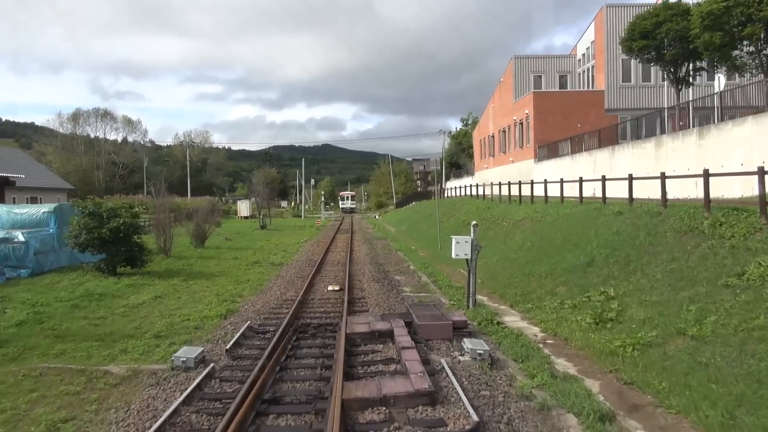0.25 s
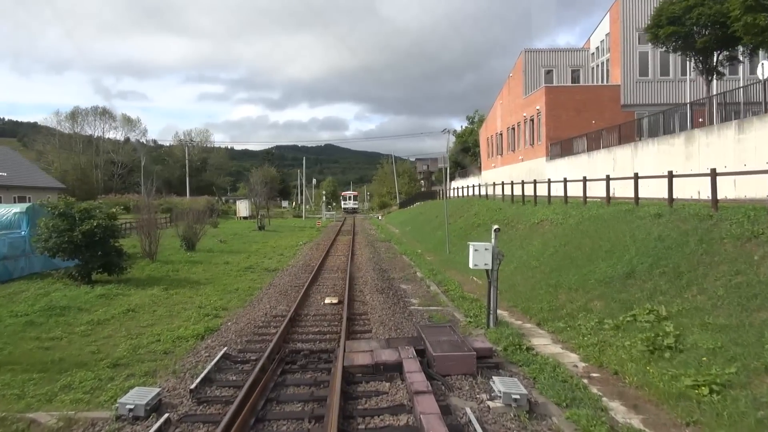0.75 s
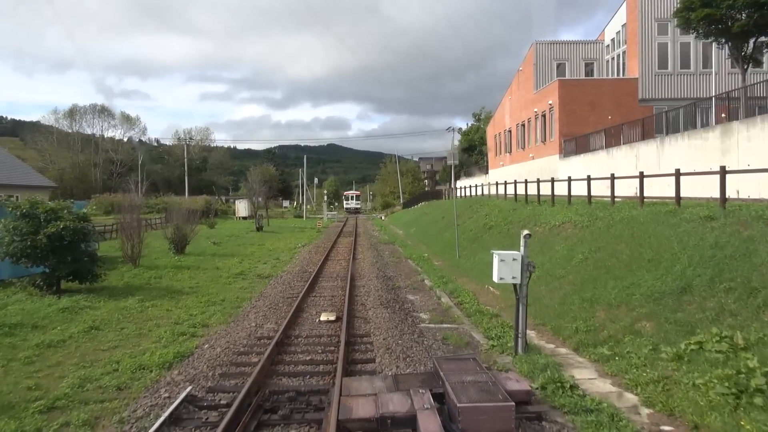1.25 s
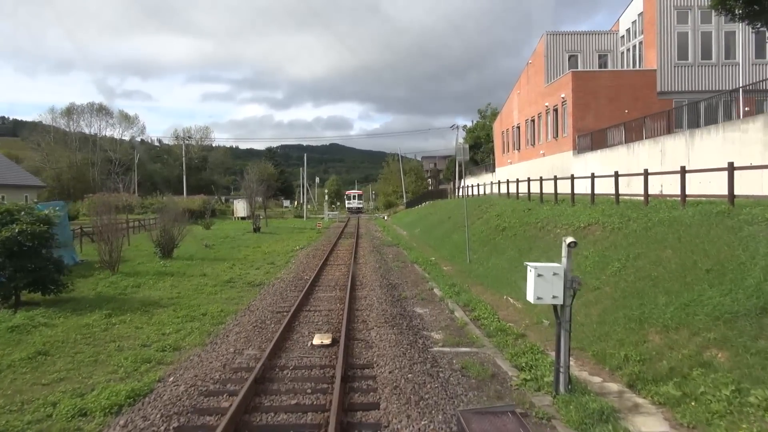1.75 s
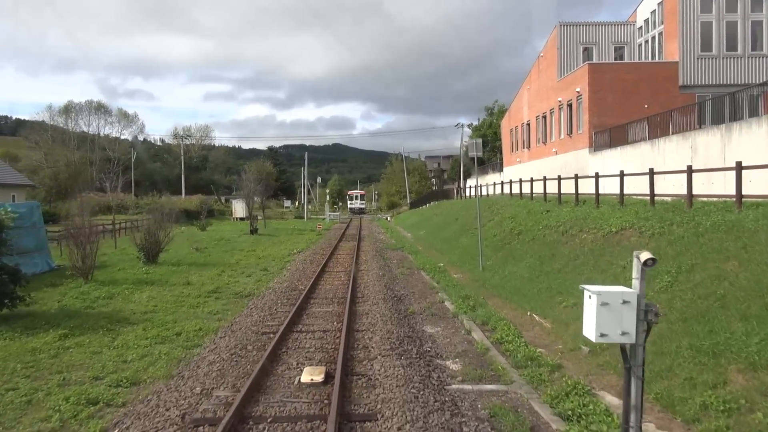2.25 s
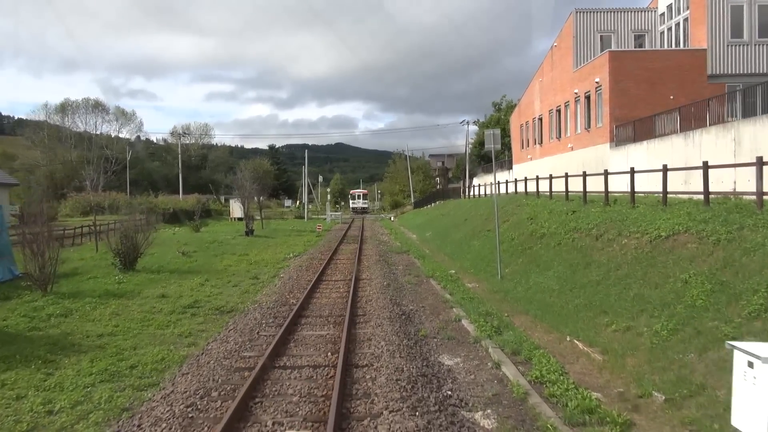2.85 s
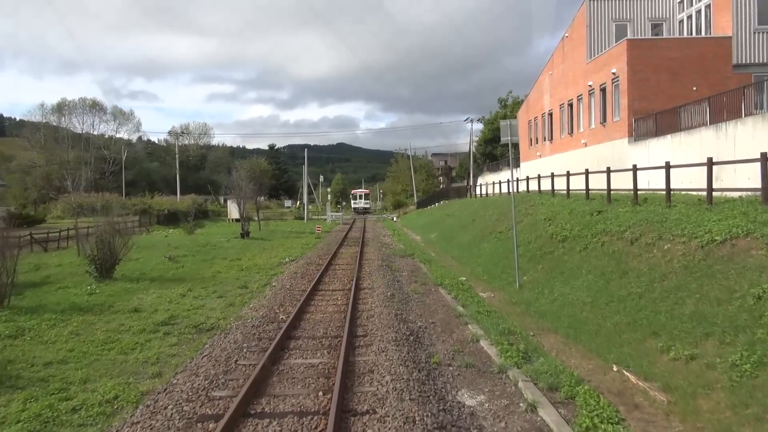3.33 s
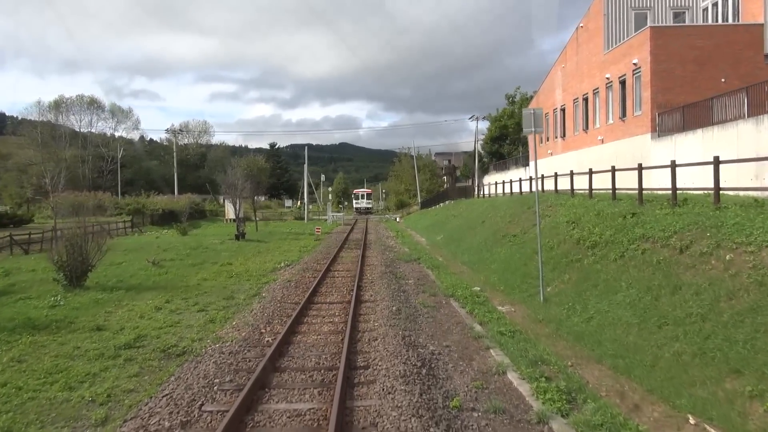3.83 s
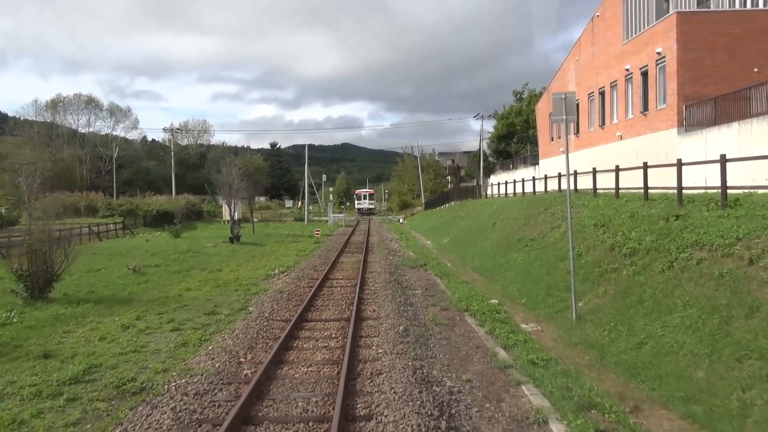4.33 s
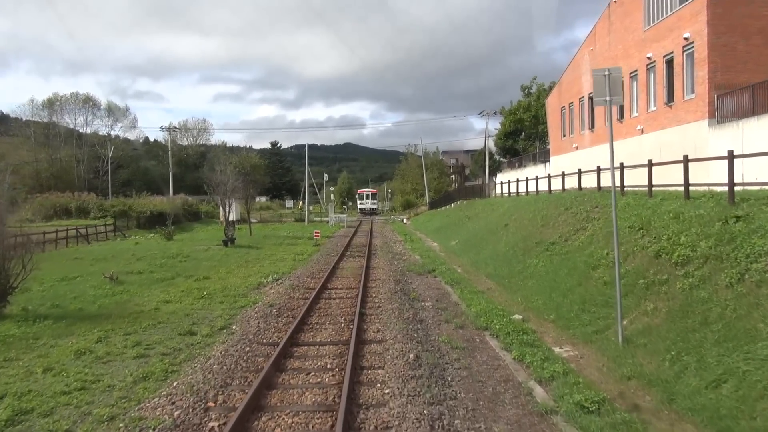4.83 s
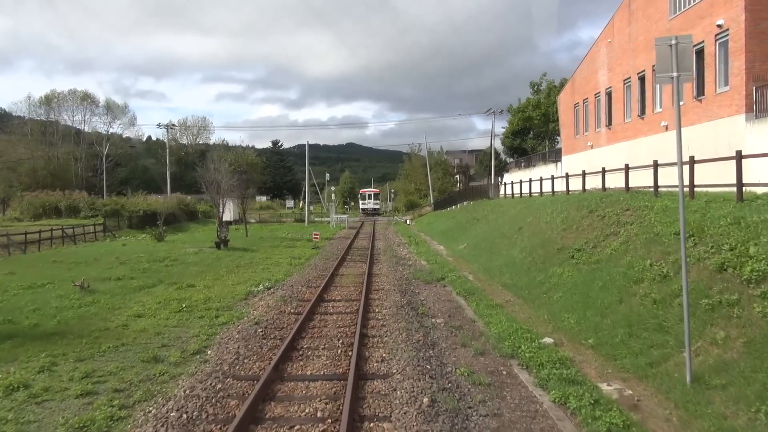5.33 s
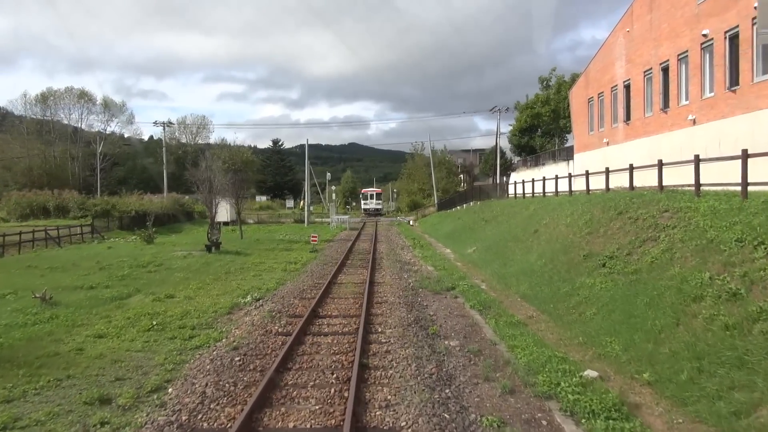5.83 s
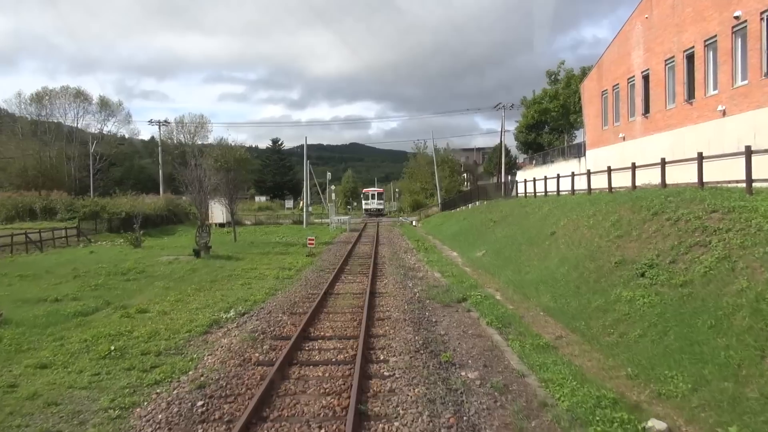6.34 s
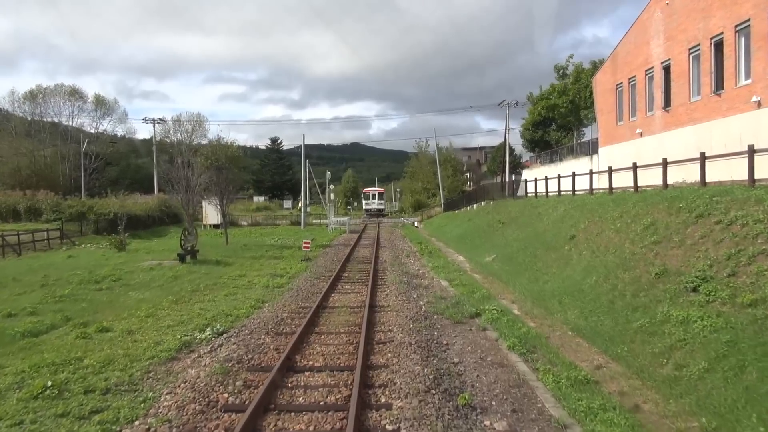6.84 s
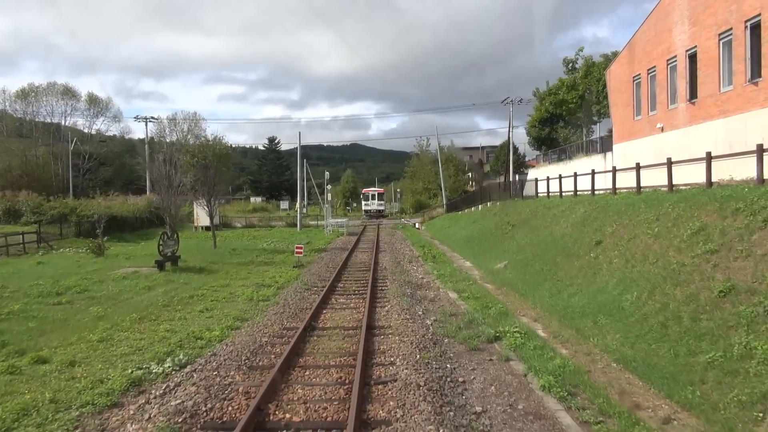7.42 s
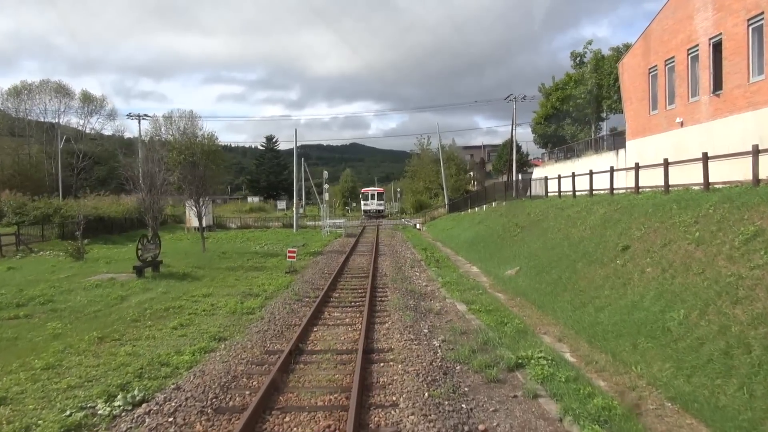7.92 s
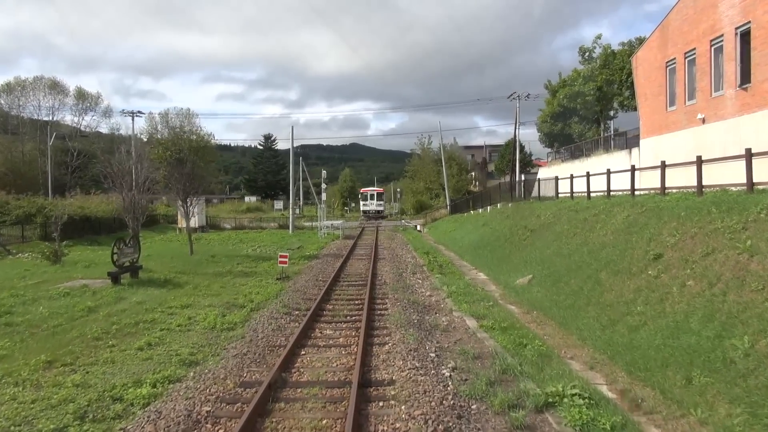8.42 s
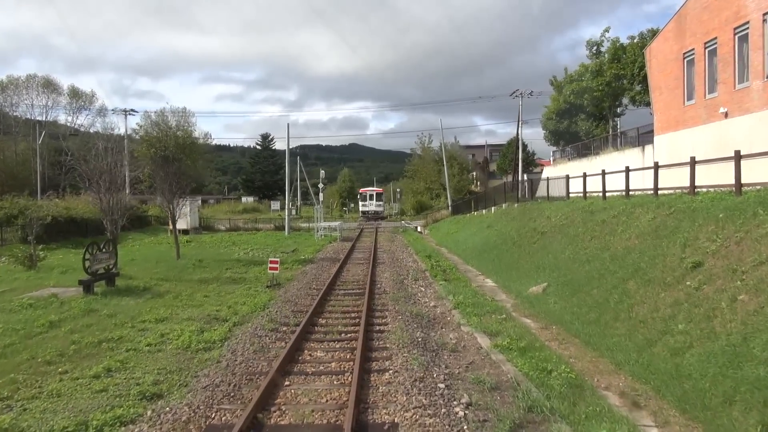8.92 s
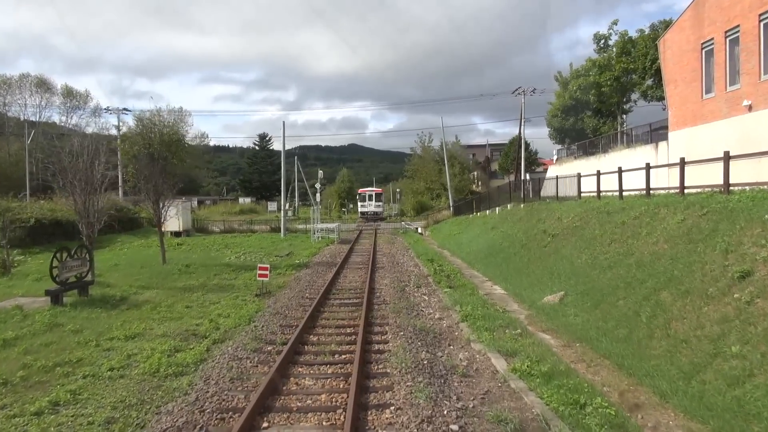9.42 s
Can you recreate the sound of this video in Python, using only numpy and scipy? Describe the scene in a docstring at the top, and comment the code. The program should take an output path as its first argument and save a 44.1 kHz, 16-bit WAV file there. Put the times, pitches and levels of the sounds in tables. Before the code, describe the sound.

Inside a slow diesel railcar's cab, low booming rumble swells over rail joints, air hisses, a metal brake handle clacks, and brakes faintly squeak.

```python
"""In the cab of a slow diesel railcar. Throughout: noise bands for booming floor, sway and panels swell again
and again, sines hum with the idling engine and a noise hiss throbs with its firing. From 4.8 s the brake handle
clacks (rattling noise plus ringing modes); until 6.2 s the valve leaks and its pipe breathes (resonant noise),
with two thin whistles near 6 s. From 6.3 s brake blocks rub (noise), squeaking (wavering sines) at 7.3, 7.7 s
and at the end. The handle hits its stop at 8.9 s with a dull knock; a second leak opens at 9.5 s."""
import sys
import numpy as np
from scipy import signal
from scipy.fft import rfft, irfft, next_fast_len
from scipy.io import wavfile
from scipy.ndimage import uniform_filter1d, map_coordinates

SR = 44100
rng = np.random.default_rng(int(sys.argv[2]) if len(sys.argv) > 2 else 0)


def to_wav(sig):
    """Store sig (one row per channel, or 1-D mono) as 16-bit WAV at the path in sys.argv[1].

    Samples outside -1..1 are clipped; the rate is SR.
    """
    pcm = np.clip(np.atleast_2d(sig), -1, 1) * 32767
    pcm = np.round(pcm).astype(np.int16)
    wavfile.write(sys.argv[1], SR, pcm.T)  # frames by channels


N = 426447

# Steady rolling: (time [s], floor boom [dB], sway [dB], body rumble [dB], panel roar [dB])
ROLL = [(0.0, -30, -34, -33, -39.5), (0.51, -22, -36, -34.5, -40.5), (0.99, -19.5, -31, -33.5, -39.5),
        (1.48, -23, -36, -32, -39), (1.86, -23, -29, -30.5, -40), (2.21, -24, -40, -33, -40),
        (2.67, -25, -34.5, -35, -40), (3.5, -24, -30.5, -33.5, -39.5), (3.88, -21, -38, -34, -40),
        (4.09, -21, -30, -34, -39), (4.31, -26, -31, -33.5, -40.5), (5.25, -23.5, -34, -36, -41),
        (6.11, -23, -33, -34, -38.5), (6.97, -23.5, -32.5, -33.5, -39.5),
        (7.86, -20.5, -31.5, -29.5, -38.5), (8.11, -22.5, -27.5, -32.5, -39.5),
        (8.89, -23.5, -29, -33.5, -38), (9.67, -25, -33, -33, -38.5)]
# Swells of the rolling: rail joints, rough spots, a boom already sounding at 0 s, the handle's slam at 8.94 s:
# (time [s], body rumble [dB], rumble t60 [s], floor boom [dB], sway [dB])
ROLL_SWELLS = [(0.0, -34, .3, -14.5, -40), (0.72, -23, 0.26, -38, -19), (1.24, -24.5, 0.8, -16, -16.5),
               (1.58, -27, 0.38, -14, -40), (1.81, -22, 0.58, -10.5, -29), (1.92, -33, 0.21, -16, -42),
               (2.28, -40, 0.27, -21, -15.5), (2.96, -45, .3, -35, -16.5), (3.66, -39, 0.41, -12.5, -37),
               (3.955, -40, .3, -14, -37), (4.24, -22.5, 0.51, -6, -16), (4.388, -43, .3, -11, -48),
               (4.753, -18, 0.25, -4.5, -21), (4.9, -43, 0.26, -23, -30), (5.26, -45, .3, -18, -21),
               (5.489, -16, 0.18, -26, -32), (6.0, -19, 0.43, -17, -30), (6.2, -35, 0.25, -17.5, -35),
               (6.5, -39, 0.33, -26, -18), (6.7, -38, 0.27, -19, -36), (7.1, -26, 0.29, -17.5, -21),
               (7.25, -35, 0.46, -17.5, -35), (7.62, -23, 0.77, -23, -14), (8.029, -44, 0.27, -15.5, -32),
               (8.55, -43, .3, -21, -31), (8.94, -20, 0.37, -21.5, -28), (9.08, -34, 0.25, -20.5, -31),
               (9.4, -26.5, .4, -15.5, -35)]
# Colour of each rolling range: (frequency [Hz], relative density [dB])
BOOM_COLOUR = [(50, -120), (60, -30), (75, -7), (88, -3.5), (97, 3.5), (106, -4.5), (115, -2.5), (128, -12),
               (140, -21), (170, -37), (220, -120)]
SWAY_COLOUR = [(12, -65), (22, -19), (40, -11), (48, -2), (70, 0.5), (80, -31), (100, -45), (130, -120)]
RUMBLE_COLOUR = [(110, -120), (135, -10), (150, -4.5), (185, -3.5), (205, -4), (221, 0), (238, -6),
                 (265, -5.5), (300, -7), (385, -11), (424, -8), (455, -17.5), (500, -29), (650, -50),
                 (1100, -120)]
ROAR_COLOUR = [(270, -4.5), (460, 0), (507, 3.5), (589, 4), (677, -1), (839, 5), (908, 0), (969, 0),
               (1170, -6), (1400, -9), (1820, -12.5), (3080, -120)]
BOOM_RISE_S, BOOM_T60_S = 0.0072, 0.63
SWAY_RISE_S, SWAY_T60_S = 0.022, 0.47
RUMBLE_RISE_S = 0.022
PANELS_BELOW_DB = 12  # panels answer a swell this far under the body

FIRING_HZ = 28.3  # mean idle firing rate
# Engine orders heard in the cab: (multiple of the firing rate [-], level [dB])
HUM = [(1, -61), (4, -41), (9.5, -47.5), (19, -63), (20.5, -55)]
# Colour of the air hiss: (frequency [Hz], relative density [dB])
HISS_COLOUR = [(700, -19), (1200, -5), (1500, -2), (2000, -0.5), (2500, -3.5), (3800, -8.5), (4500, -8.5),
               (4950, -11.5), (5350, -10.5), (6600, -14.5), (7300, -12), (8800, -14.5), (10400, -21.5),
               (11900, -21.5), (13500, -28), (15600, -32)]
HISS_DB = -45  # centre of its wandering level

# Brake blocks on the treads: (time [s], level [dB])
RUB = [(6.3, -73), (6.9, -64), (7.3, -53), (7.6, -58), (7.68, -60), (7.8, -54), (8.3, -57), (8.8, -58),
       (9.1, -50)]
# Colour of the rubbing: (frequency [Hz], relative density [dB])
RUB_COLOUR = [(1200, -30), (2000, -7), (3000, 4), (4500, -6), (7000, -10), (11000, -28), (15000, -30)]
# Squeaks of the blocks: (loudest time [s], tone [Hz], level [dB], drift [Hz/s], stretch of the rise [-],
# tail [s], upper partial [Hz], upper partial relative to the tone [dB])
SQUEAKS = [(7.33, 6610, -47, -100, .8, .15, 13250, -15), (7.735, 6490, -49, 400, 1.5, .235, 13220, -12),
           (9.68, 6420, -54, -100, 1.01, .2, 12900, -17)]
# How a squeak grips and lets go: (time from its loudest [s], relative level [dB])
GRIP = [(-.11, -19), (-.05, -5), (0, 0), (.05, -3.5), (.085, -10)]
TAIL_DB, HZ_PER_DB = -10, 0.5  # level at the end of the tail, pitch gained as it swells
SLIP_SCATTER_HZ, SLIP_WANDER_HZ = 105, 22  # fast and slow unsteadiness of pitch

# Leaks through the valve: (opens [s], shuts [s], level [dB])
LEAKS = [(5.06, 6.2, -55), (9.47, 9.8, -58)]
LEAK_FADE_S = 0.04
# Resonances of the valve passages: (frequency [Hz], width [Hz], level [dB])
VALVE = [(4820, 95, -7), (5250, 80, -1.5), (7240, 100, -13), (7960, 100, -14), (9920, 110, -13),
         (11500, 200, -22)]
# Air in the brake pipe: (time [s], level [dB])
PIPE_AIR = [(5.1, -75), (5.15, -57), (5.185, -46), (5.23, -53), (5.38, -50), (5.46, -56), (5.74, -48),
            (5.9, -52), (6.04, -52), (6.16, -57), (6.21, -75)]
# Resonances of the brake pipe: (frequency [Hz], width [Hz], level [dB])
PIPE = [(1975, 95, 0), (2160, 120, -6), (2400, 600, -11), (4830, 90, -13)]
# Brief whistles: (loudest time [s], frequency [Hz], level [dB])
WHISTLES = [(5.955, 9900, -62), (5.99, 9535, -55)]
WHISTLE_RISE_DB_PER_S, WHISTLE_FALL_DB_PER_S = 170, 85

# The handle hits its stop: (time [s], level [dB], t60 [s])
SLAM = (8.933, -15, 0.17)
# Colour of that knock: (frequency [Hz], relative density [dB])
THUMP_COLOUR = [(76, -36), (130, -40), (232, 8.5), (327, -0.5), (544, -3), (674, -19), (1860, -18),
                (2200, -24), (2860, -52), (4840, -120)]
# Handle clacks, with a faint hissing burst at 7.64 s and a faint tick at 7.925 s:
# (time [s], rise [s], rattle t60 [s], ring t60 below 4.5 kHz [s],
# rattle near each of CLACK_HZ [dB] ..., each mode of RINGS [dB] ...)
CLACKS = [(4.786, .0045, .18, .2, -30, -39, -41, -39, -45, -50, -60, -66, -70, -67, -70, -69, -70, -70, -70, -70, -74, -70, -61, -73, -84, -83, -86),
          (5.028, .005, .2, .25, -34, -40, -35, -40, -42, -52, -52, -65, -60, -66, -52, -49.5, -62, -70, -71, -74, -76, -70, -58, -66, -68, -68, -90),
          (5.048, .0025, 0.18, 0.31, -33, -33, -28.5, -31, -29, -35, -35, -45, -49, -67, -46, -58, -42, -70, -70, -48, -55, -50, -50, -41, -44, -47, -48),
          (5.066, .003, 0.15, 0.26, -33, -34, -28, -31, -36, -40, -40, -50, -46, -60, -44, -60, -48, -70, -70, -50, -60, -52, -52, -46, -55, -50, -56),
          (6.181, .0012, 0.25, 0.21, -39, -34, -23, -38, -28.5, -35, -36, -55, -70, -60, -39, -41, -70, -50, -70, -70, -76, -70, -47, -52, -59, -86, -70),
          (6.277, 0.0035, 0.26, 0.32, -31, -31, -31.5, -32, -37, -42, -45, -70, -52, -50, -70, -45, -70, -70, -45, -60, -66, -52, -75, -70, -83, -77, -90),
          (7.64, 0.0055, 0.56, .6, -50, -46, -46, -46, -44, -58, -51, -62, -70, -67, -61, -69, -70, -70, -70, -74, -58, -70, -75, -84, -76, -86, -90),
          (7.925, .0046, 0.16, .2, -35, -36, -42, -43, -53, -59, -59, -62, -70, -58, -70, -69, -66, -70, -70, -74, -64, -70, -75, -78, -70, -86, -82),
          (8.203, .0045, .17, .2, -37, -37, -46, -41, -43, -56, -57, -70, -70, -67, -57, -69, -70, -70, -63, -59, -71, -70, -75, -72, -83, -86, -90),
          (8.25, .0044, 0.32, .3, -31, -32, -42, -39, -45, -58, -55, -70, -70, -67, -65, -69, -70, -70, -65, -64, -76, -70, -75, -84, -72, -86, -90),
          (8.839, .0076, .16, .2, -37, -24, -28, -38, -39, -41, -44, -55, -60, -45, -49, -58, -71, -70, -55, -55, -55, -70, -75, -60, -55, -86, -64),
          (8.856, 0.0026, 0.22, .32, -28, -29, -24, -20.5, -21.5, -24, -27, -44, -60, -39, -50, -36, -50, -50, -50, -74, -42, -50, -60, -50, -37, -46, -52),
          (8.866, .003, .22, 0.28, -36, -34, -26, -26, -29, -32, -36, -55, -60, -41, -47, -32, -50, -37, -60, -60, -41, -44, -60, -57, -40, -48, -58),
          (8.929, 0.0032, 0.26, 0.29, -21, -21.5, -21, -26, -32, -38, -49, -49, -52, -33, -43, -41, -50, -70, -49, -42, -45, -60, -63, -62, -70, -64, -71),
          (9.32, 0.004, 0.38, .35, -27, -26, -23.5, -25, -23, -27, -33, -34, -60, -53, -49, -49, -48, -60, -51, -50, -52, -60, -50, -84, -83, -86, -48),
          (9.369, .003, 0.23, 0.27, -29, -25, -27, -20, -24, -23, -30, -38, -60, -43, -42, -47, -71, -60, -71, -50, -37, -50, -40, -83, -83, -47, -54),
          (9.395, .005, .2, .22, -19, -34, -22, -26, -29, -29, -36, -43, -60, -67, -70, -69, -71, -60, -44, -50, -46, -60, -45, -49, -69, -54, -54),
          (9.423, 0.0027, 0.24, 0.36, -33, -27, -22, -27, -28, -29, -34, -45, -47, -67, -47, -42, -41, -60, -48, -73, -46, -60, -41, -46, -44, -42, -46),
          (9.452, .0055, 0.14, 0.21, -34, -35, -36, -34, -36, -40, -41, -58, -55, -55, -55, -52, -52, -60, -61, -74, -55, -60, -49, -56, -58, -55, -55),
          (9.483, .005, .15, 0.32, -45, -45, -42, -45, -48, -55, -60, -70, -60, -70, -62, -53, -54, -70, -60, -74, -70, -70, -53, -70, -70, -70, -70)]
# Centres of the rattle bands: frequency [Hz]
CLACK_HZ = [1300, 2400, 3700, 5600, 7600, 10000, 12500, 14500]
# Modes of the handle: (frequency [Hz], pitch waver [Hz])
RINGS = [(2560, 80), (2880, 135), (3560, 150), (4100, 125), (4440, 65), (4880, 130), (5150, 70), (5430, 90),
         (6270, 110), (6820, 110), (8130, 100), (10500, 90), (11250, 170), (11980, 110), (13800, 110)]
FALL_BEND = 1.113  # above 1 a clack holds at first, then dies faster
HIGH_MODES_SHORTER = 0.5  # power by which the modes above 4.5 kHz die sooner
RING_WAVER_DB, CHATTER_DB = 4, 2.5

# Difference between left and right: (frequency [Hz], gain [dB])
WIDE = [(60, -37), (150, -20.5), (270, -17.5), (400, -14), (600, -16), (900, -38.5), (1400, -35),
        (2200, -45), (4700, -37), (5400, -6.5), (7000, -4), (9500, -6), (10800, -2.5), (11600, -28)]
# Lean of the image: (frequency [Hz], left over right [dB])
LEAN = [(60, -1), (170, -1), (270, 2), (450, 2), (750, 0)]
TOP_HZ = 15655


def amp(db):
    """Gain of a level in dB."""
    return 10 ** (np.asarray(db) / 20)


def unit(x):
    """x at rms 1."""
    return x / np.sqrt(np.mean(x ** 2) + 1e-20)


def along(points, hz):
    """Read (Hz, value) points on a log frequency axis."""
    f, v = np.transpose(points)
    return np.interp(np.log(hz + 1), np.log(f + 1), v)


def curves(rows):
    """One value per sample for each column after the time."""
    s, *cols = np.transpose(rows)
    return [np.interp(np.arange(N) / SR, s, c) for c in cols]


def wobble(rate):
    """A smooth random curve with rate knots a second."""
    knots = rng.standard_normal(int(N * rate / SR) + 4)
    return map_coordinates(knots, [np.arange(N) * rate / SR])


def filtered(x, response):
    """x shaped by a gain that depends on frequency."""
    n = x.shape[-1]
    m = next_fast_len(n + 8192)
    return irfft(rfft(x, m) * response(np.fft.rfftfreq(m, 1 / SR)), m)[..., :n]


def peaks(modes, hz):
    """Summed size of (Hz, width, dB) resonances."""
    return np.sqrt(sum(amp(db) ** 2 / (1 + (2 * (hz - c) / w) ** 2) for c, w, db in modes))


def noise(colour):
    """Coloured noise of rms 1."""
    return unit(filtered(rng.standard_normal(N), lambda hz: amp(along(colour, hz))))


def resonant_noise(modes):
    """Noise of rms 1 blown through a set of resonances."""
    return unit(filtered(rng.standard_normal(N), lambda hz: peaks(modes, hz)))


def steadied(x, seconds, share):
    """Narrow noise with part of its slow swelling taken out."""
    slow = np.sqrt(np.abs(uniform_filter1d(x * x, int(seconds * SR))) + 1e-3)
    return unit(x / slow ** share)


def swells(times, levels_db, rise_s, t60):
    """Envelope of blows that build up and die away."""
    out, t = np.zeros(N + SR), np.arange(SR) / SR
    for s, db, fall in np.broadcast(times, levels_db, t60):
        out[max(round(s * SR), 0):][:SR] += (1 - np.exp(-t / rise_s)) * amp(db - 60 * t / fall)
    return out[:N]


def rolling():
    """Rough rail shakes floor, frame and panels, each in its own range; each swell lifts them all."""
    boom_db, sway_db, rumble_db, roar_db = curves(ROLL)
    s, body_swell_db, body_t60, boom_swell_db, sway_swell_db = np.transpose(ROLL_SWELLS)
    body_swell = swells(s, body_swell_db, RUMBLE_RISE_S, body_t60)
    boom_swell = swells(s, boom_swell_db, BOOM_RISE_S, BOOM_T60_S)
    sway_swell = swells(s, sway_swell_db, SWAY_RISE_S, SWAY_T60_S)
    # hypot adds steady rolling and swells as powers
    boom = np.hypot(amp(boom_db), boom_swell) * steadied(noise(BOOM_COLOUR), 0.06, share=0.29)
    sway = np.hypot(amp(sway_db), sway_swell) * steadied(noise(SWAY_COLOUR), 0.053, share=0.42)
    rumble = np.hypot(amp(rumble_db + 0.29 * wobble(9.8)), body_swell) * noise(RUMBLE_COLOUR)
    panel_swell = amp(-PANELS_BELOW_DB) * body_swell
    roar = np.hypot(amp(roar_db + 1.25 * wobble(3.7)), panel_swell) * noise(ROAR_COLOUR)
    return boom + sway + rumble + roar


def engine():
    """Idle: a few firing orders reach the cab as sines, and the hiss throbs once per firing."""
    turn = 2 * np.pi * np.cumsum(FIRING_HZ * (1 + 0.00304 * wobble(1.484))) / SR
    hum = np.zeros(N)
    for multiple, db in HUM:
        level = amp(db + 5.4 * wobble(3.02))
        hum += level * np.sqrt(2) * np.sin(multiple * turn + rng.uniform(0, 5.86))
    # plus a slower throb, once every three firings
    throb = 1 + 0.04 * np.cos(turn) + 0.03 * np.cos(turn / 3)
    hiss_level = amp(HISS_DB + 0.6 * wobble(2.58) + 0.6 * wobble(8))
    return hum + hiss_level * throb * noise(HISS_COLOUR)


def rub():
    """Friction of the brake blocks on the wheel treads: a soft, unsteady hiss."""
    rub_db, = curves(RUB)
    touching = rub_db > rub_db.min()
    return touching * amp(rub_db + 3.5 * wobble(25)) * noise(RUB_COLOUR)


def squeaks():
    """Stick and slip of a brake block: an unsteady tone and a partial about an octave up that fades first."""
    out, t = np.zeros(N), np.arange(N) / SR
    for s, hz, db, drift, stretch, tail, upper_hz, upper_db in SQUEAKS:
        shape = [(GRIP[0][0] - 0.02, -60), *GRIP, (tail, TAIL_DB), (tail + 0.02, -60)]
        # only the rise is stretched
        timed = [(s + when * (stretch if when < 0 else 1), level) for when, level in shape]
        swell_db, = curves(timed)
        pitch = hz + HZ_PER_DB * swell_db + drift * np.clip(t - s, -0.5, 0.5)
        slip = SLIP_SCATTER_HZ * wobble(600) + SLIP_WANDER_HZ * wobble(30)
        tone = np.sin(2 * np.pi * np.cumsum(pitch + slip) / SR)
        upper = np.sin(2 * np.pi * np.cumsum(upper_hz + 1.4 * slip) / SR)
        level = (swell_db > -60) * amp(db + swell_db + 3 * wobble(70))
        out += level * np.sqrt(2) * (tone + amp(upper_db + swell_db / 2) * upper)
    return out


def valve():
    """Air escapes through the valve's narrow passages, swells in the brake pipe and briefly whistles."""
    t = np.arange(N) / SR
    flow = np.zeros(N)
    for opens, shuts, db in LEAKS:
        flow += amp(db) * np.clip(np.minimum(t - opens, shuts - t) / LEAK_FADE_S, 0, 1)
    leak = flow * amp(2.5 * wobble(13)) * resonant_noise(VALVE)
    pipe_db, = curves(PIPE_AIR)
    flowing = pipe_db > pipe_db.min()
    out = leak + flowing * amp(pipe_db + 2 * wobble(25)) * resonant_noise(PIPE)
    for s, hz, db in WHISTLES:
        swell_db = db - np.maximum(WHISTLE_RISE_DB_PER_S * (s - t), WHISTLE_FALL_DB_PER_S * (t - s))
        tone = np.sin(2 * np.pi * np.cumsum(hz + 70 * wobble(300)) / SR)
        out += amp(swell_db + 3.5 * wobble(50)) * np.sqrt(2) * tone
    return out


def slam():
    """The handle meets its stop: a dull knock of low noise through the desk."""
    s, db, t60 = SLAM
    return swells(s, db, 0.0052, t60) * noise(THUMP_COLOUR)


def handle():
    """Clacks rattle the metal and ring its modes; hard cab walls smear the attack and make the rings waver."""
    out, t = np.zeros(N + SR), np.arange(SR // 3) / SR
    ring_hz, waver_hz = np.transpose(RINGS)[:, :, None]
    bands = len(CLACK_HZ)

    def waver(rate):
        """A separate random curve for each mode, rate knots a second."""
        knots = rng.standard_normal((len(RINGS), rate))
        where = np.broadcast_arrays(np.arange(len(RINGS))[:, None], t * rate)
        return map_coordinates(knots, where, order=1)

    for s, rise_s, t60, ring_t60, *levels in CLACKS:
        bands_db, rings_db = levels[:bands], np.array(levels[bands:])[:, None]
        colour = [(600, bands_db[0] - 13), *zip(CLACK_HZ, bands_db), (16000, bands_db[-1] - 15)]
        rattle = filtered(rng.standard_normal(len(t)), lambda hz: amp(along(colour, hz)))
        rattle *= amp(CHATTER_DB * waver(180)[0] - 60 * (t / t60) ** FALL_BEND)

        cycles = np.cumsum(ring_hz + waver_hz * waver(500), 1) / SR + rng.random((len(RINGS), 1))
        mode_t60 = ring_t60 * np.minimum(1, 4500 / ring_hz) ** HIGH_MODES_SHORTER
        dying_db = -60 * (t / mode_t60) ** FALL_BEND
        mode_level = amp(rings_db + dying_db + RING_WAVER_DB * waver(200))
        ringing = np.sqrt(2) * np.sum(mode_level * np.sin(2 * np.pi * cycles), 0)

        rise = (1 - np.exp(-t / rise_s)) ** 2
        # the soft rise starts 4 ms ahead of the listed time
        out[round((s - 0.004) * SR):][:len(t)] += rise * (rattle + ringing)
    return out[:N]


def scene():
    """Nearly the same sound in both channels, with a random-phase part opposite in left and right."""
    mid = rolling() + engine() + rub() + squeaks() + valve() + slam() + handle()
    # random phases keep the spectrum over time
    z = signal.stft(mid, nperseg=1024)[2]
    random_phase = signal.istft(z * np.exp(2j * np.pi * rng.random(z.shape)), nperseg=1024)[1][:N]
    side = filtered(random_phase, lambda hz: amp(along(WIDE, hz)))
    # half the lean goes to each channel
    leaning = filtered(np.array([mid, mid]), lambda hz: amp(along(LEAN, hz) * [[0.5], [-0.5]]))
    return leaning + [side, -side]


def record(dry):
    """Band limit: nothing from TOP_HZ upward passes."""
    return filtered(dry, lambda hz: hz < TOP_HZ)


dry = scene()
out = record(dry)
to_wav(out)
```